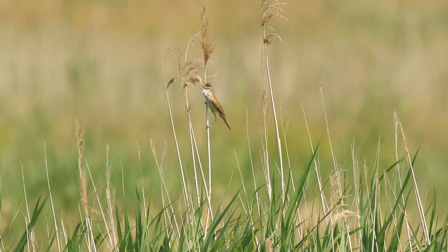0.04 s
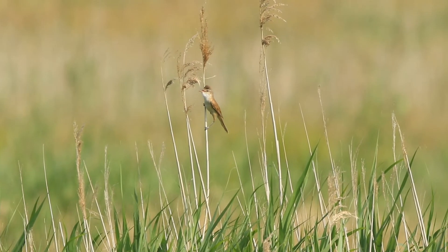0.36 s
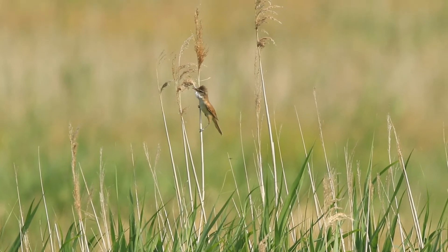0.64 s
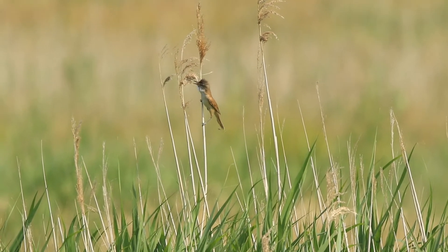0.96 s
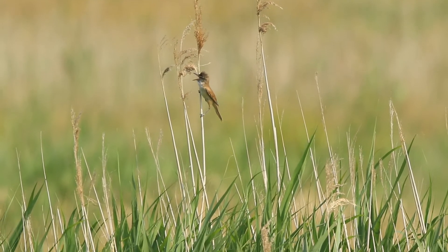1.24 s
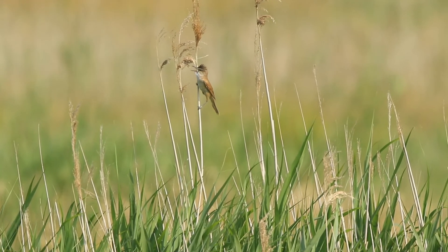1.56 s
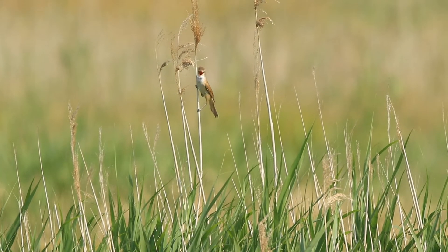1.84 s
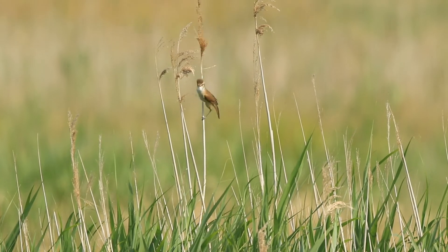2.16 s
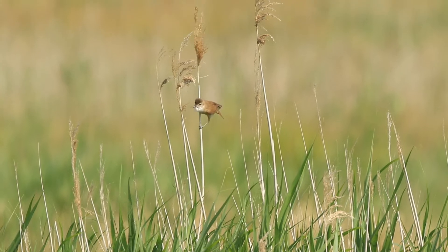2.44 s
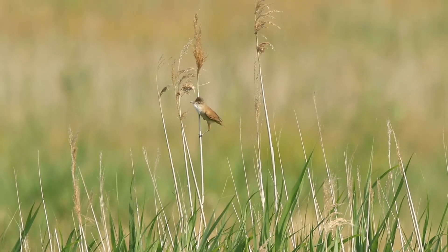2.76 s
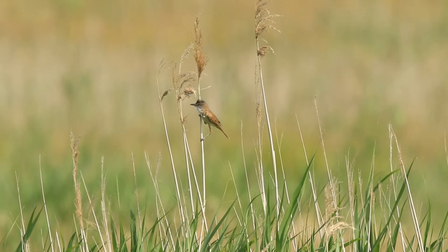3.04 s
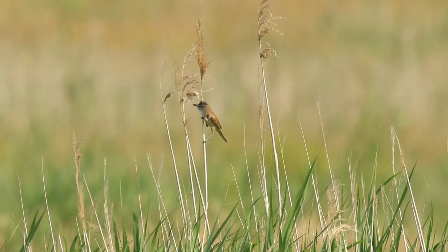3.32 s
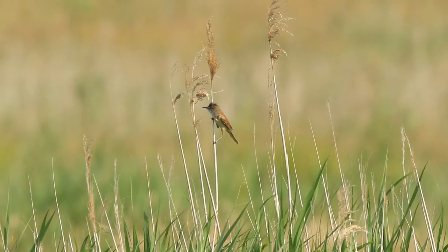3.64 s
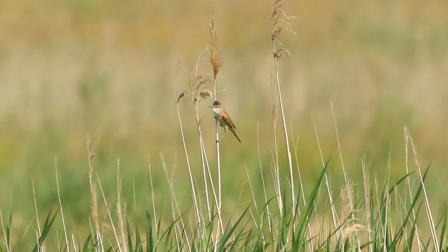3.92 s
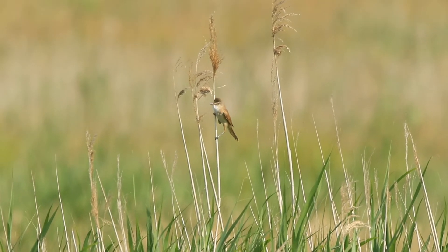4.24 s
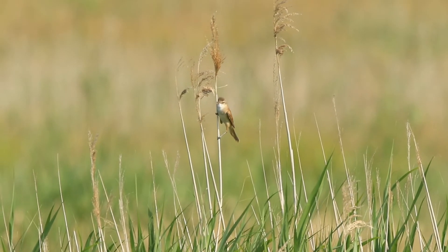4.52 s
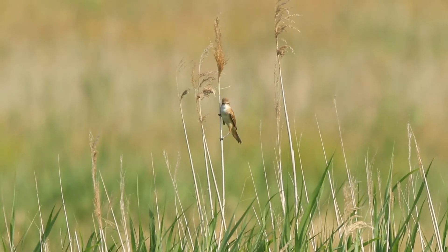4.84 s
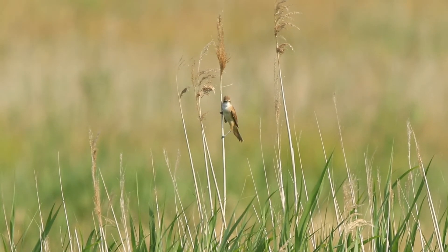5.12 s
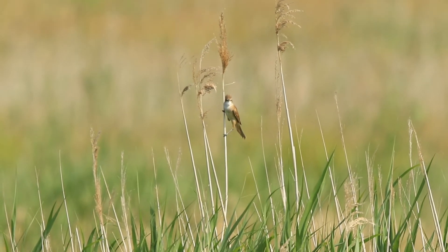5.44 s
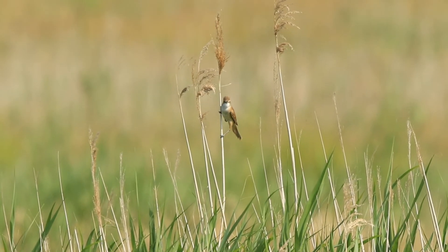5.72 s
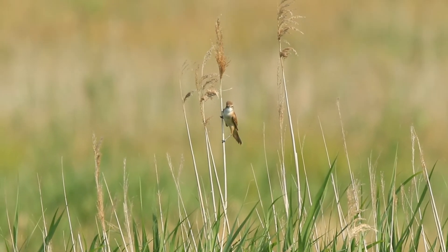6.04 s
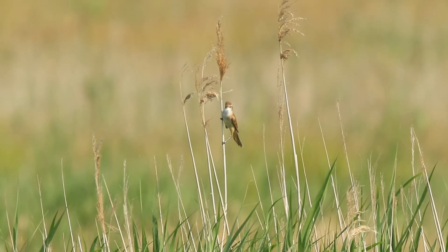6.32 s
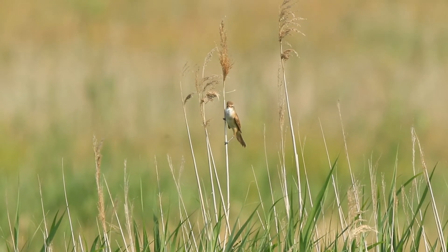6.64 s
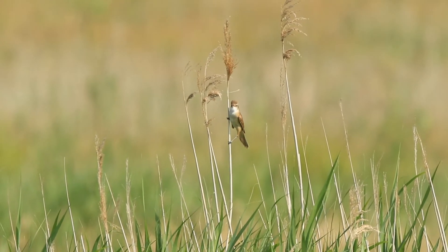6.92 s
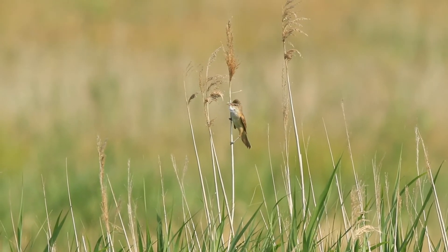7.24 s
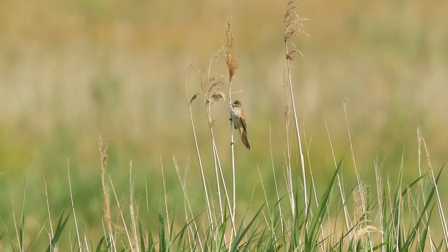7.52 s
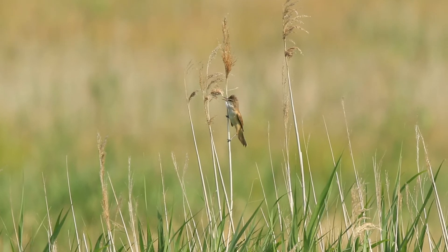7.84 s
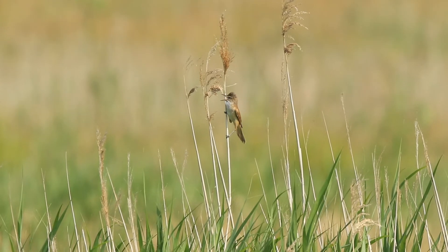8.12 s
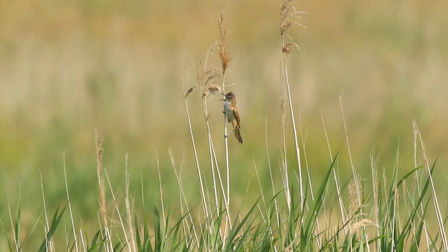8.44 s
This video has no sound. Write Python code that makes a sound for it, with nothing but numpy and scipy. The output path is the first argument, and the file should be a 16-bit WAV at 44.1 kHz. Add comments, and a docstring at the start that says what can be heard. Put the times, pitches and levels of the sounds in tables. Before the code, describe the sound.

In a quiet reed bed, a small bird close to the microphone mixes harsh pulsed croaks with thin, high sweeps and creaky yelps. Two piercing cracks stand out early on. Spaced chirps and trills come next, then more rasps and some nasal calls, all with a slight short echo. Farther off, other birds whistle softly, stems tap very faintly and a low rumble swells gently.

```python
"""A great reed warbler sings from a reed stem, close and straight ahead of a stereo microphone.
Its syrinx membranes slap out grating rasps, creaks and two very loud cracks that overload the
microphone; both sides of the syrinx whistle thin sweeps and trills, and the throat shapes nasal notes.
The reed bed scatters a short echo. Deeper in the marsh other birds whistle and stems tap faintly,
over quiet air and a soft low rumble."""
import sys
import numpy as np
from scipy import signal
from scipy.fft import rfft, irfft
from scipy.io import wavfile
from scipy.ndimage import uniform_filter1d, minimum_filter1d, map_coordinates

SR = 44100
rng = np.random.default_rng(int(sys.argv[2]) if len(sys.argv) > 2 else 0)


def wav_out(sig):
    """Save sig, one row per channel (or a flat mono array), as 16-bit PCM at SR to the path in sys.argv[1]."""
    wavfile.write(sys.argv[1], SR, np.round(np.clip(np.atleast_2d(sig).T, -1, 1) * 32767).astype(np.int16))


N = 382347

# shapes of the sweeps and trills (time into the note [s], pitch [Hz], level [dB])
SWOOP = [(0, 5313, -69), (.016, 5408, -43), (.045, 5544, -25.5), (.067, 5588, -16.5), (.077, 7000, -50),
         (.089, 5627, -17), (.1, 4800, -21)]
SWOOP_END = [(0, 4930, -20), (.02, 4617, -24), (.04, 4380, -26), (.054, 4420, -29)]
TWIST = [(0, 5972, -34.5), (.011, 6310, -34), (.028, 5550, -20.5), (.042, 5710, -21), (.05, 6296, -19),
         (.058, 5900, -30), (.065, 6150, -22), (.076, 4930, -29.5)]
SLIDE = [(0, 5600, -28), (.02, 5250, -33.5), (.04, 4910, -30.5), (.054, 4400, -27), (.065, 4100, -22)]
ARCH = [(0, 5266, -46), (.006, 5910, -35.5), (.018, 6120, -44), (0.032, 6000, -30.5), (.046, 6320, -39)]
DIP = [(0, 7345, -75), (.039, 6690, -53.5), (.053, 5660, -31), (.063, 4380, -68.5), (0.069, 5650, -32),
       (.085, 5640, -31), (0.127, 5510, -55)]
BUZZ = [(0, 4272, -28), (0.099, 4398, -25), (.147, 4337, -28), (.166, 4155, -32), (0.186, 4220, -57)]
DIVE = [(0, 7211, -59.5), (.008, 6663, -37.5), (.021, 6300, -24.5), (.036, 5780, -28), (.043, 5165, -20.5),
        (.051, 4200, -20.5)]
HOOK = [(0, 4800, -68), (.009, 4980, -46.5), (0.016, 5490, -44), (.022, 3800, -64)]
FLICK = [(0, 4480, -45.5), (.006, 4730, -46.5), (.012, 5480, -27.5), (.02, 5950, -31)]
DROP = [(0, 4060, -29), (.01, 4118, -50.5), (.045, 4120, -42), (0.075, 4097, -36), (.086, 3800, -27.5),
        (0.094, 3320, -37)]
UNDER = [(0, 2600, -69.5), (0.017, 2695, -54), (.036, 2640, -44), (.043, 2406, -44), (.11, 2700, -42)]
WAVE = [(0, 6150, -47), (0.019, 5700, -43.5), (0.035, 6560, -41.5), (0.044, 5944, -28), (.057, 5760, -42.5),
        (.069, 6550, -33.5), (0.08, 6060, -27), (.093, 6030, -44.5)]
PURR = [(0, 4720, -69.5), (.025, 4570, -53), (.06, 4400, -41.5), (.1, 4350, -39), (.14, 4520, -39.5),
        (.159, 4780, -55)]
LEAD_IN = [(0, 5500, -57.5), (.012, 5650, -50), (.02, 6000, -44.5), (.028, 5750, -36.5)]
UNDERTONE = [(0, 3620, -60), (.015, 3738, -65), (.027, 3650, -50), (.036, 3590, -62)]
STUTTER = [(0, 4250, -29.5), (.035, 4200, -41), (.045, 4100, -46.5)]
SHIVER = [(0, 5700, -28.5), (0.023, 5246, -32)]
TRAIL = [(0, 3356, -33), (0.028, 3200, -39.5), (.05, 2870, -48.5), (.09, 2710, -65.5)]
# reedy note shapes (time into the note [s], pitch [Hz], level [dB], treble lift [dB], roughness [0-1])
YELP = [(0, 1726, -28.5, 4.5, .9), (.012, 1861, -17, 0, .5), (.021, 1881, -14, 1, 0.02),
        (.03, 1927, -10, -1, .08), (0.038, 1955, -10, 2, .08), (.042, 1895, -12, -3.5, 0.2),
        (.048, 1672, -19.5, 1, .8)]
BRAY = [(0, 1532, -25.5, -3.5, .5), (.009, 1506, -16, -7, .15), (.019, 1479, -14, -8, .06),
        (.032, 1448, -19.5, 4.5, .04), (.042, 1460, -26, 10.5, .04), (.05, 1422, -30.5, 15, .04),
        (.055, 1474, -38, 7, .04)]
KIP = [(0, 1145, -26, 2, .5), (.005, 1154, -22.5, 3, 0.26), (0.017, 1192, -26, 0.5, 0.058),
       (0.032, 1172, -19, -3.5, .05), (.035, 1172, -21.5, -3.5, .05)]
NASAL = [(0, 1123, -26.5, -3.5, 0.22), (.005, 1207, -25.5, 5.5, 0.074), (0.021, 1226, -21, 4, 0.019),
         (.042, 1209, -21.5, 4, 0.013), (.06, 1189, -25, 4, .025), (.097, 1181, -18.5, -2, 0.027),
         (0.109, 1141, -26, -8, 0.046)]
# harmonics of the reedy notes (multiple, gain [dB])
YELP_TONE = [(1, -35.5), (2, -3), (3, -22), (5, -57.5)]
BRAY_TONE = [(1, -38.5), (2, 1), (3, 2.5), (4, -16.5), (5, -55), (6, -65)]
NASAL_TONE = [(1, -29.5), (2, -19.5), (3, 1), (4, -18), (5, -51), (6, -53), (7, -68), (8, -57.5),
              (9, -60.5)]
# the two cracks (time [s], level [dB], throat pitch [Hz])
CRACKS = [(1.921, -9, 3122), (2.034, -10, 3128)]


def undb(db):
    """Decibels to gain."""
    return 10 ** (np.asarray(db) / 20)


def level(x, db):
    """Scale to an rms level."""
    return x * undb(db) / np.sqrt(np.mean(x ** 2) + 1e-20)


def add(out, s, x):
    """Mix x into out from time s."""
    i = int(s * SR)
    out[i:i + len(x)] += x[:len(out) - i]


def contour(rows, length=None):
    """Time axis and the columns of a shape, joined by lines with rounded corners."""
    s, *columns = np.transpose(rows)
    t = np.arange(int((length or s[-1]) * SR)) / SR
    return [t] + [uniform_filter1d(np.interp(t, s, c), size=120, mode="nearest") for c in columns]


def fade(t, edge=0.0055):
    """Soft start and stop of a note."""
    return np.sin(np.pi / 2 * np.clip(np.minimum(t, t[-1] - t) / edge, 0, 1)) ** 2


def wander(t, rate):
    """Smooth random drift with a spread near 1."""
    knots = rng.standard_normal(4096)
    return map_coordinates(knots, [t * rate], order=3, mode="mirror")


def phase_of(hz):
    """Running phase of a pitch curve."""
    return 2 * np.pi * np.cumsum(hz) / SR


def colour(x, points, size=4096):
    """Causal filter with the response given as (frequency [Hz], gain [dB])."""
    hz, db = np.transpose(points)
    bin_hz = np.arange(size // 2 + 1) * SR / size
    gain = undb(np.interp(np.log(bin_hz + 1), np.log(hz), db))
    cepstrum = irfft(np.log(gain))
    cepstrum[1:size // 2] *= 2
    cepstrum[size // 2 + 1:] = 0
    return signal.fftconvolve(x, irfft(np.exp(rfft(cepstrum))))[:len(x)]


def marsh_air(air_db=-71, lull_db=-78, side_db=-17):
    """Quiet outdoor air around the microphone and a low rumble that swells now and then."""
    # spectra of the air and the rumble (frequency [Hz], gain [dB])
    air_colour = [(15, -37.5), (25, -8), (55, -3), (178, -2), (281, -9), (359, -3.5), (433, -9),
                  (469, -5.5), (826, -6.5), (970, -8), (3090, -21), (5010, -22), (6380, -25.5),
                  (15500, -28)]
    rumble_colour = [(30, -22.5), (70, -8.5), (130, -2.5), (210, 1), (300, -1.5), (420, -11.5),
                     (700, -27.5), (1500, -50.5)]
    # swells of the rumble (time of the top [s], half width [s], level [dB])
    swells = [(5.07, 0.33, -66), (5.5, .2, -66.5), (5.88, 0.34, -64.5), (7.3, 0.28, -63.5),
              (8.019, 0.39, -67.5), (8.579, 0.18, -61)]
    t = np.arange(N) / SR
    air, side = (level(colour(rng.standard_normal(N), air_colour), air_db) for _ in range(2))
    swell_power = sum((undb(db) * np.exp(-((t - s) / width) ** 2)) ** 2 for s, width, db in swells)
    rumble = level(colour(rng.standard_normal(N), rumble_colour), 0)
    rumble *= np.sqrt(undb(lull_db) ** 2 + swell_power)
    return air * undb(0.2 * wander(t, 6)) + rumble + undb(side_db) * side * np.array([[1], [-1]])


def pulses(length, rate_hz, jitter, scatter_db):
    """Uneven slaps of the syrinx membranes, followed by a little silence to ring in."""
    chance = rng.standard_normal((256, 2))
    times = np.cumsum(np.exp(jitter * chance[:, 0]) / rate_hz)
    times -= times[0]
    keep = times < length
    out = np.zeros(int(length * SR) + SR // 50)
    out[(times[keep] * SR).astype(int)] = undb(scatter_db * chance[keep, 1])
    return out


def slur(x, centre_hz, s_per_hz=9e-7):
    """Each pulse falls in pitch as it rings: the lows come a little after the highs."""
    hz = np.arange(len(x) // 2 + 1) * SR / len(x)
    return irfft(rfft(x) * np.exp(1j * np.pi * s_per_hz * (hz - centre_hz) ** 2), len(x))


def throat_bursts(packets, response, rate_hz, jitter, scatter_db, flutter_db, gain_db=0):
    """Pulse packets (time [s], length [s], level [dB], throat pitch [Hz]) ring in the throat."""
    out = np.zeros(N)
    lead = SR // 32  # the membranes flutter faintly just before each packet
    usual_hz = np.mean([hz for *_, hz in packets])
    for s, length, db, throat_hz in packets:
        flutter = rng.standard_normal(lead) * np.linspace(0, 1, lead) * np.sqrt(rate_hz / SR)
        slaps = pulses(length, rate_hz, jitter, scatter_db)
        drive = slur(np.concatenate([undb(flutter_db) * flutter, slaps]), throat_hz)
        half = [(hz * throat_hz / usual_hz, gain / 2) for hz, gain in response]
        ring = colour(colour(drive, half)[::-1], half)[::-1]  # both ways: each pulse has a soft front
        add(out, s + .001 - lead / SR, level(ring, db + gain_db) * np.sqrt(length * SR / len(ring)))
    return out


def rasps():
    """Teks and croaks grate through the same throat resonances."""
    # throat response (frequency [Hz], gain [dB])
    rasp_colour = [(600, -64), (900, -42), (1200, -15.5), (1650, -31), (1900, -2.5), (2300, 6),
                   (2700, -1.5), (3200, -11.5), (3700, -25.5), (4400, -59.5), (7000, -74.5), (10500, -70),
                   (14000, -89)]
    return throat_bursts(croak_packets() + tek_packets(), rasp_colour, rate_hz=470, jitter=.24,
                         scatter_db=0.6, flutter_db=-25.5, gain_db=-3)


def tek_packets(beat_s=.009, tick_s=.0035, packet_s=.0075, head_s=.014, tail_db=-11, fade_db_per_s=151):
    """A tek is a single rasp: a tick, a loud head, and weaker packets that sputter away."""
    # (time [s], length [s], level [dB], throat pitch [Hz], tick against the head [dB])
    teks = [(0.154, .006, -36.5, 2560, -17), (0.191, .025, -12.5, 2490, -8), (6.39, .008, -23, 2328, -17),
            (6.832, .016, -15, 2453, -22), (7.407, .033, -13.5, 2497, -17.5),
            (7.888, .061, -14.5, 2395, -25), (7.992, .042, -9.5, 2372, -35)]
    packets = []
    for s, length, db, hz, tick_db in teks:
        packets.append((s - beat_s, tick_s, db + tick_db, hz))
        for t in np.arange(0, length, beat_s):
            spent = 1 - np.exp(-(t / head_s) ** 2)
            packets.append((s + t, packet_s, db + tail_db * spent - fade_db_per_s * t, hz))
    return packets


def syrinx(shape, length, db, depth_hz=0, rate_hz=0, dip_db=0, rasp_db=1.08, jitter=.0015):
    """One nearly pure tone; a warble, never quite even, swings pitch and loudness together."""
    t, hz, shape_db = contour(shape, length)
    swing = -np.cos(phase_of(rate_hz * (1 + .05 * wander(t, 90))))
    hz = hz * (1 + jitter * wander(t, 250)) + depth_hz * swing
    shape_db = shape_db + rasp_db * wander(t, 900) - dip_db * ((1 + swing) / 2) ** 2
    return undb(db + shape_db) * fade(t, edge=.004) * np.sin(phase_of(hz))


def whistles():
    """Sweeps and trills; they overlap where both sides of the syrinx sing at once."""
    # plain whistles (time [s], shape, length [s], gain [dB])
    sweeps = [ (0.358, LEAD_IN, 0.046, -1), (0.384, SLIDE, 0.063, 0.5), (0.4, TWIST, .076, 0),
              (1.227, SWOOP, .1, -3), (1.433, DIVE, 0.047, -1.5), (2.984, SWOOP, .1, -2),
              (3.088, UNDERTONE, 0.034, -2.5), (3.564, SWOOP, 0.095, 0.5), (3.669, UNDERTONE, .032, 0),
              (4.196, HOOK, 0.025, -5), (4.222, DROP, 0.091, 1), (4.207, UNDER, 0.12, 1),
              (4.777, LEAD_IN, 0.021, -11), (4.792, FLICK, 0.01, -8), (4.797, ARCH, 0.042, 2.5),
              (4.845, SLIDE, 0.068, -1.5), (4.905, ARCH, 0.038, 4.5), (5.341, DIP, .12, 1),
              (6.318, FLICK, 0.028, -18.5), (6.331, FLICK, 0.021, -10), (6.358, DIVE, 0.057, -4),
              (6.427, SWOOP, .1, -11.5), (6.963, SWOOP, .1, -5.5), (7.1, WAVE, .081, 1),
              (7.564, HOOK, 0.026, 8), (7.588, DROP, 0.094, 5), (7.615, WAVE, 0.085, -1.5),
              (8.16, LEAD_IN, 0.025, -11.5), (8.175, FLICK, 0.02, -0.5), (8.195, FLICK, 0.02, 6.5),
              (8.213, FLICK, .018, 7)]
    # warbled whistles (time [s], shape, length [s], gain [dB], depth [Hz], rate [Hz], dip [dB])
    trills = [(0.443, STUTTER, 0.052, -1, 347, 95, -2), (.474, SWOOP_END, .054, -0.5, 110, 44, 13),
              (1.481, BUZZ, 0.1, 1, 254.3, 200, 0.5), (2.369, PURR, 0.15, 1.5, 70, 172, 4),
              (3.082, SWOOP_END, .054, 1.5, 110, 38.6, 11), (3.661, SWOOP_END, 0.06, -2, 110, 38.5, 6),
              (4.313, TRAIL, 0.1, 5.5, 200, 95, 5), (4.842, SHIVER, 0.021, 2.5, 280, 230, 6),
              (4.907, STUTTER, 0.036, -4.5, 343, 64, -8), (4.953, SHIVER, 0.019, 0, 282, 224, 2),
              (6.407, BUZZ, 0.17, 0.5, 260, 193, -2), (6.526, SWOOP_END, 0.059, -8, 110, 42.8, 5.5),
              (7.06, SWOOP_END, 0.051, -6.5, 110, 39.4, 11), (7.684, TRAIL, 0.034, -3.5, 220, 96, -5.5)]
    out = np.zeros(N)
    for s, *note in sweeps + trills:
        add(out, s, syrinx(*note))
    return out


def far_birds(edge_db=-8):
    """Soft fluty whistles from across the marsh; each bends through one arc, swelling and fading."""
    # (time [s], length [s], start pitch [Hz], middle pitch [Hz], end pitch [Hz], level [dB])
    calls = [(0.431, 0.11, 1993, 2660, 2690, -71), (0.527, 0.048, 3510, 3540, 3380, -64),
             (0.565, 0.097, 2080, 2060, 2077, -57), (1.702, .12, 2850, 2590, 2396, -58),
             (2.492, 0.12, 2085, 2360, 2610, -55), (2.605, 0.072, 3000, 3170, 2540, -65),
             (2.667, .085, 2154, 1810, 1400, -64.5), (2.67, .25, 4350, 4200, 3900, -81.5),
             (2.754, 0.074, 2040, 1993, 1630, -65.5), (3.171, 0.037, 2433, 2350, 2260, -67),
             (3.738, 0.07, 3010, 3570, 3120, -61), (3.88, 0.069, 2940, 3480, 3148, -61),
             (3.834, 0.18, 2293, 2510, 2060, -82), (4.408, 0.13, 1794, 1775, 1745, -58.5),
             (4.524, .09, 1757, 1674, 1506, -62), (5.094, .13, 3370, 3280, 3000, -76.5),
             (5.55, 0.16, 3100, 3360, 3050, -75.5), (6.505, 0.12, 2090, 2396, 2425, -47.5),
             (6.595, 0.14, 2470, 2300, 2270, -52), (6.71, 0.086, 2260, 1987, 1600, -43.5),
             (8.375, 0.092, 2320, 2147, 1700, -53)]
    out = np.zeros(N)
    for s, length, start_hz, middle_hz, end_hz, db in calls:
        t = np.arange(int(length * SR)) / SR
        along = 2 * t / length - 1
        hz = np.polyval(np.polyfit([-1, 0, 1], [start_hz, middle_hz, end_hz], 2), along)
        voice = np.sin(phase_of(hz * (1 + 0.006 * wander(t, 130))))
        add(out, s, undb(db + edge_db * along ** 2) * fade(t, edge=0.013) * voice)
    return out


def croak_packets(beat_s=.012, tick_s=.0039, strong_s=.0072, weak_s=.0049, weak_db=-5, fade_db_per_s=31):
    """A croak is a short rattle: two faint ticks run up, then strong and weak beats alternate."""
    # (time of the first full beat [s], level [dB], throat pitch [Hz])
    croaks = [(.65, -12.5, 2221), (.764, -9.5, 2273), (0.997, -11, 2288), (1.114, -9, 2288)]
    packets = []
    for s, db, hz in croaks:
        packets += [(s - .0044 - k * .0099, tick_s, db - 11 * k, hz) for k in (1, 2)]
        for k in range(5):
            length, accent_db = (weak_s, weak_db) if k % 2 else (strong_s, 0)
            packets.append((s + k * beat_s, length, db + accent_db - fade_db_per_s * k * beat_s, hz))
    return packets


def chitters(rate_hz=53.5, first_flick_s=.0172, sharpness=3.2, dip_db=11):
    """A held whistle jerks upwards again and again, and weakens as it leaves the throat's resonance."""
    # (time [s], level [dB])
    onsets = [(0.822, -23), (0.9459, -21), (5.7894, -24.5), (5.9096, -22)]
    # one chitter (time into it [s], base pitch [Hz], gain [dB], flick height [Hz])
    shape = [(0, 3364, -20.5, 1), (.006, 4164, -1.5, 370), (.013, 4015, -1, 999), (.028, 4250, 0.5, 960),
             (.048, 4130, -3, 830), (.064, 4180, -0.5, 901), (.075, 4242, -12, 746.5),
             (.084, 4240, -11.5, 940)]
    out = np.zeros(N)
    for s, db in onsets:
        t, hz, shape_db, height = contour(shape)
        flick = np.abs(np.cos(np.pi * rate_hz * (t - first_flick_s))) ** sharpness
        hz = (hz + height * flick) * (1 + 0.0029 * wander(t, 380))
        add(out, s, undb(db + shape_db - dip_db * flick) * fade(t) * np.sin(phase_of(hz)))
    return out


def creaks():
    """Dense chaotic pulses swell and die as the voice locks on to the pitch of a yelp."""
    # (time of the peak [s], rise [s], fall [s], level [dB])
    peaks = [(1.354, 0.02, 0.012, -18.5), (1.602, .019, 0.019, -22)]
    # throat response (frequency [Hz], gain [dB])
    creak_colour = [(710, -83.5), (1200, -46.5), (1690, -36), (2150, -51.5), (2360, -31.5), (2740, -6),
                    (3750, -8.5), (4480, 2.5), (5190, -11), (5540, -9.5), (6310, -11.5), (7320, -67),
                    (11000, -69.5), (14300, -101), (22000, -120)]
    out = np.zeros(N)
    for s, rise, fall, db in peaks:
        slaps = pulses(2 * (rise + fall), rate_hz=1100, jitter=0.56, scatter_db=2)
        voice = level(colour(slaps, creak_colour), db)
        t = np.arange(len(voice)) / SR - 2 * rise
        add(out, s - 2 * rise, voice * np.exp(-(t / np.where(t < 0, rise, fall)) ** 2))
    return out


def reedy_notes(jitter=0.038, shimmer_db=5, flutter_db=0.5, treble_hz=4200):
    """Harmonic notes; the throat favours a harmonic or two, and the pitch shakes in a rough voice."""
    # (time [s], shape, harmonics, gain [dB], pitch factor, added treble lift [dB])
    notes = [(1.35, YELP, YELP_TONE, 4.5, 1.004, -5), (1.389, BRAY, BRAY_TONE, -2, 1.017, -1),
             (1.595, YELP, YELP_TONE, 3, 1.0, -11), (1.63, BRAY, BRAY_TONE, -4.5, 1.011, 3),
             (8.211, KIP, NASAL_TONE, -2.5, .99, 1), (8.266, NASAL, NASAL_TONE, 0.5, 0.99, 3.5),
             (8.454, KIP, NASAL_TONE, -20.5, 1.0, -3.5), (8.481, KIP, NASAL_TONE, 0.5, 1.01, 2),
             (8.538, NASAL, NASAL_TONE, 1.5, 1, -4.5)]
    out = np.zeros(N)
    for s, shape, harmonics, db, pitch, lift_db in notes:
        t, hz, shape_db, bright_db, rough = contour(shape)
        phase = phase_of(hz * pitch * (1 + jitter * rough * wander(t, 1500)))
        tone = np.zeros(len(t))
        for k, harmonic_db in harmonics:
            in_treble = k * hz.mean() > treble_hz
            tone += undb(harmonic_db + in_treble * (bright_db + lift_db)) * np.sin(k * phase)
        shape_db = shape_db + shimmer_db * rough * wander(t, 650) + flutter_db * wander(t, 120.14)
        add(out, s, undb(db + shape_db) * fade(t) * tone)
    return out


def cracks():
    """Three ticks and a hard main burst of membrane slaps, ringing high in the throat."""
    # packets of one crack (time from the main burst [s], length [s], gain [dB])
    pattern = [(-.0305, .0074, -10), (-.0155, .0032, -13.5), (-.0105, .004, -6.5), (0, .0105, -1)]
    # throat response (frequency [Hz], gain [dB])
    crack_colour = [(600, -64), (1000, -31), (1400, -16.5), (1900, -33), (2400, 1), (2900, 4.5), (3600, -1),
                    (4400, -8), (5000, -37), (7000, -45), (12000, -61)]
    packets = [(s + t, length, db + step_db, hz)
               for s, db, hz in CRACKS for t, length, step_db in pattern]
    return throat_bursts(packets, crack_colour, rate_hz=360, jitter=.23, scatter_db=-.5, flutter_db=-30)


def pips(delay_s=0.0054, boost_db=10):
    """The brief, piercing tone at the end of each crack."""
    # (time into the tone [s], pitch [Hz], gain [dB])
    shape = [(0, 2839, 1.5), (.004, 2966, 0), (.0145, 2950, -1), (.016, 2840, -12.5)]
    out = np.zeros(N)
    t, hz, shape_db = contour(shape)
    tone = fade(t, edge=0.0016) * np.sin(phase_of(hz))
    for s, db, _ in CRACKS:
        add(out, s + delay_s, undb(db + boost_db + shape_db) * tone)
    return out


def taps(t60=0.023):
    """Faint dull knocks, as of stems touching."""
    # (time [s], peak level [dB])
    touches = [(2.171, -54.5), (2.252, -54), (2.339, -53.5), (2.411, -57), (2.72, -53.5), (3.697, -53.5),
               (3.76, -57), (4.089, -55.5), (4.16, -55.5), (4.328, -54.5), (5.372, -57), (5.531, -51.5),
               (5.768, -51.5)]
    # spectrum of a knock (frequency [Hz], gain [dB])
    tap_colour = [(250, -30), (500, -1), (850, 4.5), (1100, -4.5), (1600, -9), (2500, -26.5), (8000, -36)]
    out = np.zeros(N)
    t = np.arange(SR // 16) / SR
    for s, db in touches:
        knock = colour(rng.standard_normal(len(t)) * np.exp(-np.log(1000) * t / t60), tap_colour)
        add(out, s, undb(db) * knock / np.abs(knock).max())
    return out


def reflection(x, lag_s, db):
    """One bounce reaches the microphone later and weaker than the direct sound."""
    return undb(db) * np.pad(x, (int(lag_s * SR), 0))[:N]


def reed_bed(x, near_db, near_t60, far_db, far_t60, side_db=-24):
    """Stems close by scatter a quick dense echo, the wider bed a faint longer one, both near centre."""
    t = np.arange(SR // 2) / SR
    arrival = np.clip((t - .004) / .003, 0, 1)
    spread = 0
    for db, t60 in ((near_db, near_t60), (far_db, far_t60)):
        tail = arrival * np.exp(-np.log(1000) * t / t60)
        spread = spread + undb(db) * tail / np.sqrt(np.sum(tail ** 2))
    mid, side = (signal.fftconvolve(x, spread * rng.standard_normal(len(t)))[:N] for _ in range(2))
    return x + mid + undb(side_db) * side * np.array([[1], [-1]])


def scene():
    """The warbler close in front of the microphone, the other birds deeper in the reeds."""
    song = rasps() + cracks() + pips() + creaks() + reedy_notes() + whistles() + chitters()
    # the ground bounce combs the rasps and beats against every glide
    song = song + reflection(song, lag_s=.00312, db=-15)
    near = reed_bed(song, near_db=-12.5, near_t60=0.105, far_db=-32.5, far_t60=0.24)
    slap = reflection(song, lag_s=0.023, db=-33)  # from a stand of reeds further off
    far = reed_bed(far_birds() + taps(), near_db=-13.5, near_t60=0.124, far_db=-19.5, far_t60=0.47)
    return near + slap + far + marsh_air()


def record(dry, ceiling=1.4, top_hz=15800):
    """A fast limiter holds the cracks near full scale, what still overshoots clips; the top is cut."""
    needed = np.minimum(1, ceiling / (np.abs(dry).max(axis=0) + 1e-9))
    gain = uniform_filter1d(minimum_filter1d(needed, size=45), size=45)
    clipped = np.clip(dry * gain, -1, 1)
    return signal.sosfiltfilt(signal.ellip(8, .1, 60, top_hz, fs=SR, output="sos"), clipped)


dry = scene()
out = record(dry)
wav_out(out)
```